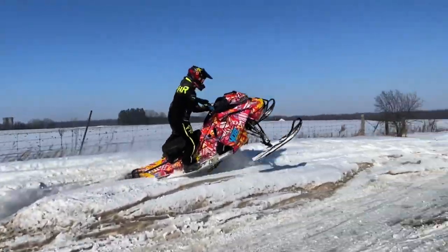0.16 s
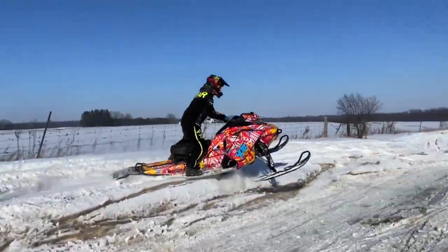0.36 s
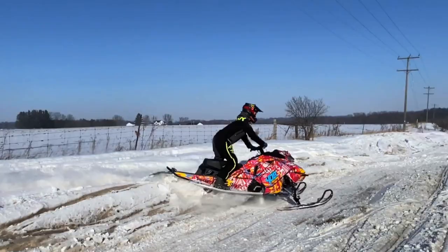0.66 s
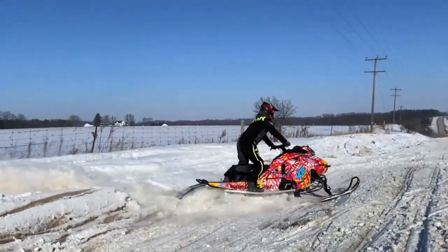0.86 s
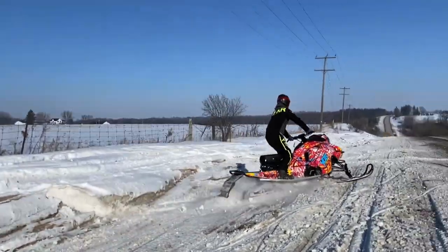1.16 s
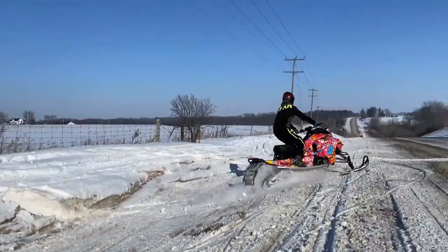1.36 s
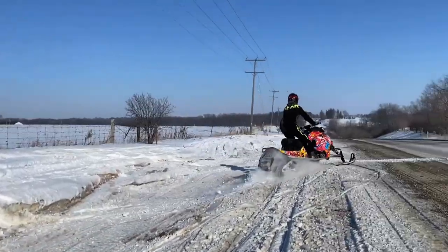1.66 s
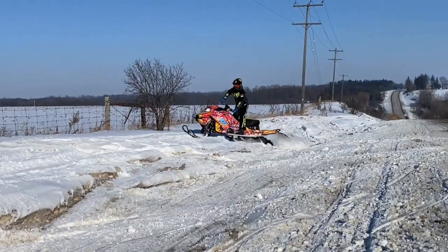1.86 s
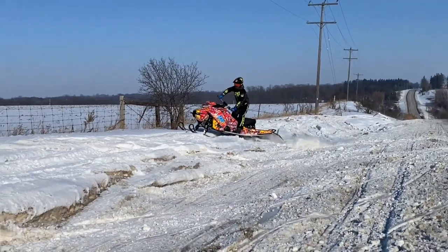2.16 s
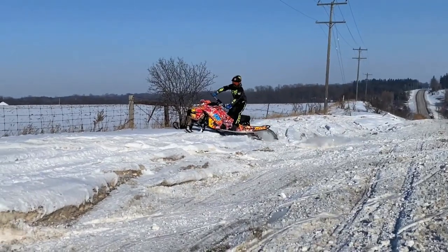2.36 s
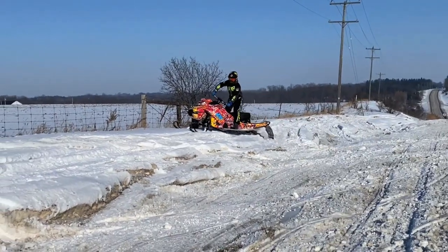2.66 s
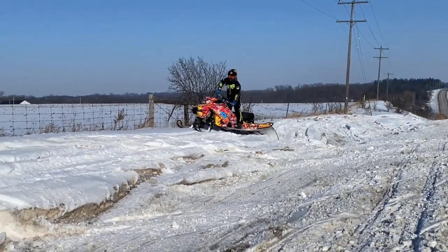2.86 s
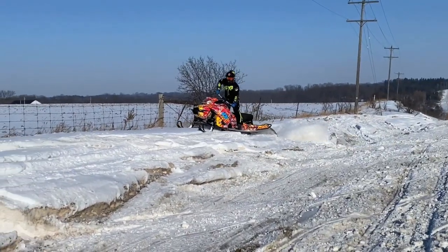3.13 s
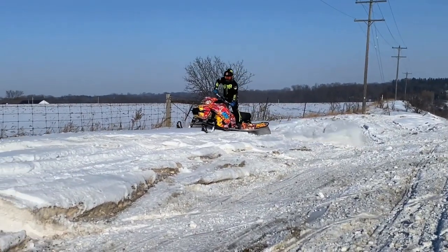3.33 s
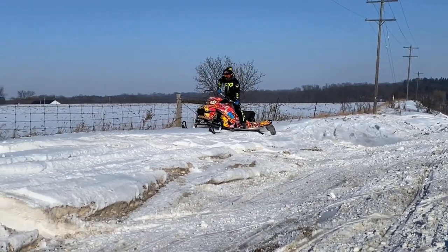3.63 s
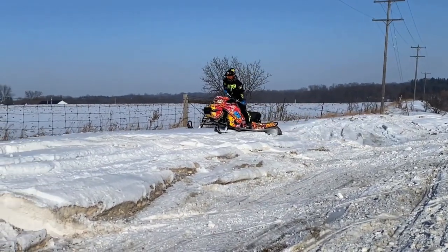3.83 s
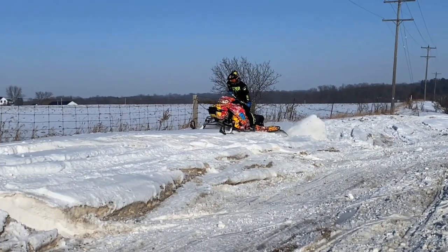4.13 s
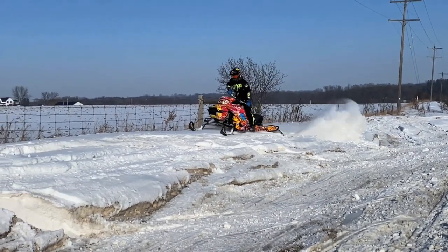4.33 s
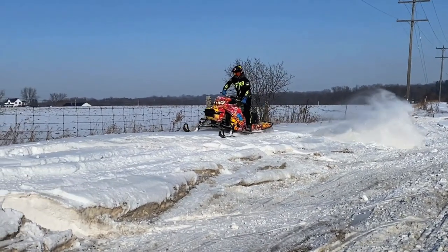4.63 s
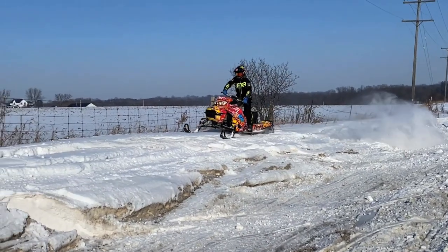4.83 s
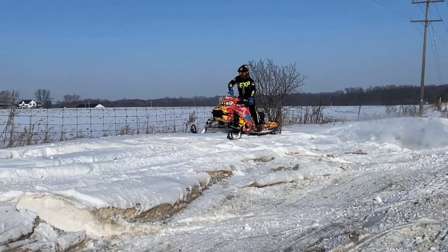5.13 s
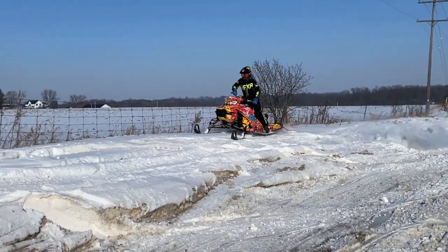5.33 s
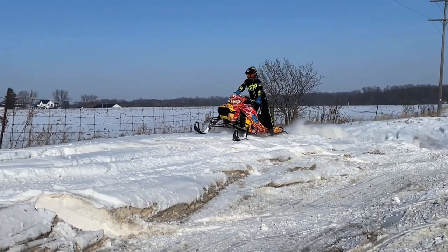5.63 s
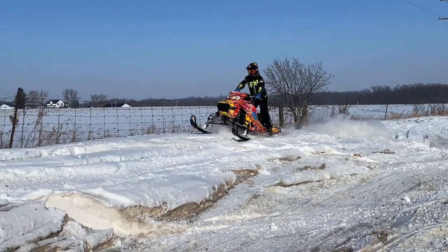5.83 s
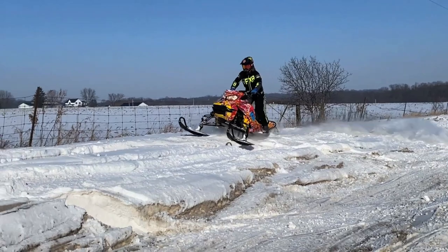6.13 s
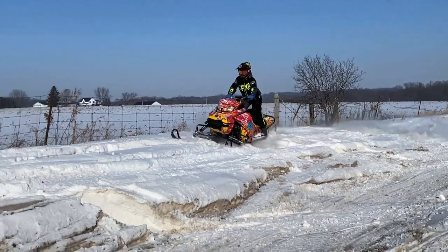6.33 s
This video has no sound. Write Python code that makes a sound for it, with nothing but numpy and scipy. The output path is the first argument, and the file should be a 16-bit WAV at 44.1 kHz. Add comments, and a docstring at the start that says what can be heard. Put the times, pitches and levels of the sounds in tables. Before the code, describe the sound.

Outdoors on packed snow, a two-stroke snowmobile passes close to the microphone at high revs, then shuts the throttle and burbles away with exhaust pops. Suddenly farther off, it gives two short blips and a harder rev, its track clattering softly underneath. After more popping, it climbs steeply to a loud, raspy full-throttle run toward the microphone, with a light hiss of thrown snow, and drops back again.

```python
"""Two-stroke snowmobile on packed snow.

It wheelies past, shuts the throttle and burbles away with one blip. At 1.7 s the listening position
jumps: the sled is farther off, facing back, and gives two blips, a harder rev and a full-throttle run
closer. Each firing is a pulse in the exhaust; off throttle the engine runs down and fires in stray pops.
Engine speed and load drive the muffler's drone, the track's clatter and the snow it throws."""
import sys
import numpy as np
from scipy import signal
from scipy.fft import rfft, irfft, next_fast_len
from scipy.io import wavfile
from scipy.ndimage import uniform_filter1d

SR = 44100
rng = np.random.default_rng(int(sys.argv[2]) if len(sys.argv) > 2 else 0)


def master(y):
    """Save y as 16-bit WAV."""
    cut = np.clip(np.atleast_2d(y).T, -1, 1)
    pcm = np.round(cut * 32767)  # scale
    wavfile.write(sys.argv[1], SR, pcm.astype(np.int16))


N = 286209
T = np.arange(N) / SR
SWITCH_S = 1.729  # listening position jumps

# Engine speed in the three long runs. Each row: time in seconds, firing rate in Hz.
JUMP_SPEED = [(0.0, 265.7), (0.07, 262.7), (0.152, 245.6), (0.218, 245.6), (0.336, 251.4), (0.42, 249.1),
              (0.542, 240.7), (0.6, 239), (0.701, 220), (0.72, 213)]
REV_SPEED = [(3.581, 144), (3.66, 153.1), (3.72, 175.9), (3.764, 204.5), (3.83, 214.5), (3.9, 225),
             (4.004, 252.4), (4.084, 264), (4.118, 262.8)]
CHARGE_SPEED = [(4.95, 141.1), (5.068, 167.1), (5.16, 207), (5.2, 208.6), (5.262, 219.4), (5.32, 227.5),
                (5.414, 252.5), (5.524, 266.3), (5.828, 264.4), (5.922, 265.8), (5.966, 260.5),
                (5.99, 256.1)]
# Throttle blips. Each row: opening, clutch bite, top and shut times in seconds; bite, top and idle rates
# in Hz; fall time in seconds; bark drop after the bite in dB (negative: above its level at shut);
# bark and rasp at shut in dB.
BLIPS = [(1.112, 1.158, 1.24, 1.285, 157.1, 167, 143.8, .1, -2, -41.5, -59),
         (1.764, 1.848, 2.0, 2.01, 179.4, 216, 152.9, .16, -2, -43, -62),
         (2.58, 2.779, 2.85, 2.895, 207.3, 219, 144, .18, -1, -39.5, -60)]
# Exhaust level in the long runs. Each row: time in seconds, bark in dB, rasp in dB.
WHEELIE_LEVELS = [(0, -22, -27), (0.102, -22, -28.5), (0.163, -24, -60)]
LANDING_LEVELS = [(.11, -26.5, -70), (.19, -24, -36), (.304, -23.5, -29.5), (0.428, -23, -33.5),
                  (0.53, -26, -35), (.562, -27, -61.5), (0.701, -36.5, -51.5), (.76, -63, -70)]
REV_LEVELS = [(3.6, -51.5, -76), (3.72, -40, -56), (3.8, -40, -56), (3.9, -33.5, -45), (3.98, -32.5, -44),
              (4.12, -34, -42), (4.165, -67, -71)]
CHARGE_LEVELS = [(4.94, -43, -67), (5.131, -36.5, -52), (5.269, -28.5, -45.5), (5.329, -20.5, -34.5),
                 (5.386, -24.5, -35), (5.427, -18, -27.5), (5.52, -22, -28), (5.66, -19, -24.5),
                 (5.841, -17, -21), (5.998, -16.5, -25)]
# Weak firing during run-down. Each row: start in seconds, length in seconds, bark in dB, rasp in dB.
OVERRUNS = [(2.03, 0.21, -63, -82), (4.162, 0.36, -56, -62), (6.114, 0.19, -36.5, -57)]
# One cylinder fires weakly until speed is up. Each row: time in seconds, imbalance from 0 to 1.
IMBALANCE = [(3.65, .15), (3.8, .42), (3.92, .38), (4.02, .28), (4.12, .26), (5.0, .18), (5.42, .15),
             (5.55, .06)]
# Uneven firing, which roughens the rasp. Each row: time in seconds, timing scatter in ms.
JITTER = [(0, .008), (.13, .013), (.25, .011), (.33, .008), (.45, .009), (.55, .012), (.72, .012),
          (5.0, .034), (5.3, .027), (5.46, .022), (5.54, .008), (5.84, .008), (5.89, .012), (5.99, .013)]
# Base levels before and after the switch. Each row: time in seconds; drone, howl, clatter, rumble in dB.
AWAY_LEVELS = [(0, -55, -85, -45, -49), (.55, -42, -78, -54, -51), (.9, -46.5, -81, -58, -47),
               (1.25, -42, -78, -57, -50), (1.72, -50, -79, -60, -48.5)]
RETURN_LEVELS = [(1.741, -53, -56, -48.5, -47), (2.05, -49, -53, -45.5, -47), (2.3, -49.5, -51, -45.5, -45),
                 (2.75, -51.5, -57.5, -46, -49), (3.4, -52, -60, -48, -48.5),
                 (4.149, -54, -59, -44.5, -44.5), (4.8, -43, -52, -49, -48.5), (5.5, -42, -37.5, -43, -43),
                 (6.1, -40, -44, -44, -45), (6.49, -38.5, -48, -46.5, -47)]
# Stray firings. Each row: start in seconds, length in seconds, boom and crack in relative dB.
POPS = [(.7893, .004, -32, -29.5), (.801, .004, -25, -35.5), (.8068, .022, -28, -36),
        (.8363, .01, -31, -42), (.8482, .004, -30, -43), (.854, .01, -30, -40), (.866, .004, -34, -43),
        (.945, .022, -32, -36.5), (1.002, .01, -28, -40.5), (1.060, .012, -30, -40),
        (1.092, .012, -27, -38.5), (1.137, .012, -31, -37), (1.399, .012, -38, -42),
        (1.415, .026, -28, -39), (1.521, .04, -31, -40), (1.668, .012, -27, -40), (3.282, .012, -37, -46),
        (3.358, .012, -34, -46), (3.415, .012, -37, -46), (3.564, .012, -36, -46), (4.169, .03, -36, -38),
        (4.41, .025, -34, -43), (4.514, .012, -27, -35), (4.597, .01, -29, -41), (4.666, .012, -29, -37),
        (4.736, .012, -29, -35.5), (4.816, .012, -24, -38), (4.929, .012, -30, -36),
        (6.041, .024, -32, -25), (6.302, .012, -32, -33), (6.318, .01, -21, -28), (6.427, .012, -22, -36),
        (6.450, .01, -24, -35), (6.474, .01, -24, -37)]
# Tunnel and hood modes. Each row: frequency in Hz, relative level in dB, 60 dB decay time in seconds.
PANEL_MODES = [(880, -1.5, 0.046), (1149, 2, 0.049), (1763, -1.5, 0.045), (1880, -4, 0.075),
               (2397, -12, 0.083), (2695, -7, 0.078)]
# Metallic ring in the turn. Each row: time in seconds, pitch in Hz, level in dB.
RING_PATH = [(1.73, 1775, -52), (1.81, 1780, -52), (1.89, 1680, -49), (2.0, 1707, -52), (2.06, 1725, -60),
             (2.15, 1690, -56), (2.24, 1660, -60), (2.36, 1685, -74)]

# Exhaust spectra by heading and throttle state. Each row: frequency in Hz, relative gain in dB.
NOSE_UP = [(200, -35.5), (265, -3), (400, -6), (530, 3), (790, -9), (1060, -6), (1320, -7.5), (1590, -8),
           (1850, -3), (2150, -20), (2400, -15.5), (3000, -21.5), (3450, -23), (4200, -21), (4700, -33.5),
           (5600, -38), (6400, -27), (7100, -27.5), (10000, -45), (15000, -63)]
SIDE_ON = [(190, -19), (250, -7.5), (500, 17.5), (750, 17.5), (1000, 14.5), (1250, 9), (1500, 11.5),
           (2000, 5), (2250, -12), (2500, 6), (2750, -4), (3000, 6), (3450, -7.5), (3780, 8.5), (4300, 1.5),
           (5500, -22.5), (6700, -1.5), (12000, -40)]
TAIL_ON = [(160, -12), (240, -4.5), (460, 10.5), (690, -9.5), (930, 6), (1200, 11.5), (1420, 2), (1750, -9),
           (2050, 5), (2650, -13), (3300, -34), (4300, -39), (6000, -55), (12000, -74)]
NEARLY_SHUT = [(100, -32), (300, -16), (480, 26), (650, 17.5), (950, 9), (1400, 13.5), (1900, 5),
               (2600, -15), (4000, -19), (6000, -41), (12000, -50)]
TURNING = [(150, -46), (300, -14), (400, 4), (600, 6), (800, -3), (1200, 5), (1550, 9), (1700, 8),
           (1950, 5), (2270, 10), (2500, -5), (2750, 4), (3400, -23), (3900, -13), (7500, -25),
           (14000, -60)]
COASTING = [(100, -28), (190, 17.5), (300, -12), (560, 8), (720, 3), (880, 18), (1050, -3), (1230, -10),
            (1420, -6), (1600, -20), (1830, 5), (2300, -7), (2680, -22), (3300, -11), (6000, -20),
            (12000, -52)]
BROADSIDE = [(150, -29), (240, -19), (440, -1), (650, 6), (870, 7), (1090, 10.5), (1310, 7), (1550, 10),
             (1950, 2), (2200, 2), (2370, 15.5), (2530, -9), (2750, 3), (3900, -6), (7500, -31),
             (14000, -62)]
FAR_OFF = [(150, -32), (240, -49), (340, 2), (530, 19), (620, 5), (760, 10.5), (850, 5.5), (980, 11.5),
           (1330, 4), (1550, 6), (1750, 8), (2100, -4), (2320, 13.5), (2550, -1), (2900, -0.5), (4200, -1),
           (7500, -17), (11500, -31), (14000, -59)]
APPROACH = [(160, -29), (250, -3), (450, 11), (700, -2), (930, 10.5), (1130, 8), (1450, 1.5), (1900, 4.5),
            (2400, -1), (2850, 0.5), (3400, -5), (4000, -4), (6100, -10.5), (8400, -20.5), (13500, -41)]
HEAD_ON = [(160, -29.5), (250, -3.5), (400, 5), (530, 7.5), (790, 5), (1060, 8), (1320, 1.5), (1700, 4.5),
           (2150, 0.5), (3500, -4.5), (6100, -9), (8400, -24.5), (11000, -27.5), (13500, -41)]
# Muffler, expansion chamber, chassis, track and snow. Each row: frequency in Hz, relative gain in dB.
MUFFLER = [(70, -21), (140, 3.5), (260, 5), (310, -14.5), (450, 2), (560, -15), (700, -31), (880, -33.5),
           (1300, -16.5), (1850, -21), (3500, -45), (9000, -75.5)]
CHAMBER = [(250, -43), (380, -1.5), (450, 5.5), (530, -2.5), (610, -1.5), (720, -26), (1100, -45.5),
           (3000, -81)]
RUMBLE = [(18, -42), (32, -9.5), (50, 0), (80, 10), (130, 4), (200, 1.5), (300, -15), (600, -42),
          (2000, -82), (8000, -108)]
CLATTER = [(150, -41), (250, -12.5), (305, -6), (411, -5), (461, -3), (631, -5), (850, 1), (2180, -8),
           (2570, -14.5), (2790, -15), (7050, -29.5), (10800, -65), (13000, -91)]
SPRAY = [(1500, -29), (3000, 9.5), (4500, 0.5), (7500, -4.5), (8600, -16), (11000, -22), (14000, -51)]
# Pops close behind, drawing away and far off. Each row: frequency in Hz, relative gain in dB.
SHARP_CRACK = [(100, 3), (480, 14.5), (750, 9), (1150, 7), (2000, 5), (2400, -2), (2800, 0.5), (4100, -4),
               (5500, -31), (7500, -17), (12000, -50)]
DULL_CRACK = [(100, -3), (480, 13.5), (700, 12), (1150, 14.5), (2000, 6), (2400, -10), (4200, -4),
              (5500, -41), (7500, -33), (12000, -53)]
FAR_CRACK = [(100, 5), (300, 5), (480, 15), (680, 6), (1000, 13), (1400, 0), (1900, 4), (2600, -9),
             (4000, -10), (6000, -16), (12000, -41)]
# Stereo balance before and after the switch. Each row: frequency in Hz, left minus right in dB.
AWAY_BALANCE = [(60, -3), (150, -5.5), (380, -7.5), (950, -6.5), (2380, -3), (5980, -4.5), (15000, -8)]
RETURN_BALANCE = [(60, -1), (150, -4.5), (380, -3.5), (950, -5), (2380, 1), (5980, -0.5), (15000, 0.5)]


def amp(db):
    """Decibels to gain."""
    return 10 ** (np.asarray(db) / 20)


def unit(x):
    """Scales to rms 1."""
    return x / np.sqrt(np.mean(x ** 2) + 1e-20)


def follow(rows):
    """Columns of a time table at every sample."""
    times_s, *columns = np.transpose(rows)
    return [np.interp(T, times_s, column) for column in columns]


def spectrum_db(spectrum, hz):
    """Interpolates a spectrum over log frequency."""
    points_hz, db = np.transpose(spectrum)
    return np.interp(np.log(hz + 1), np.log(points_hz + 1), db)


def colour(x, spectrum, size=4096):
    """Minimum-phase filter of energy 1: a body rings only after it is struck."""
    log_gain = np.log(amp(spectrum_db(spectrum, abs(np.fft.fftfreq(size, 1 / SR)))))
    ring = np.fft.ifft(np.exp(np.conj(signal.hilbert(log_gain)))).real[:size // 2]
    return signal.oaconvolve(x, ring / np.linalg.norm(ring))[:N]


def wander(rate_hz):
    """Slow random curve of rms 1."""
    size = next_fast_len(N)
    rolloff = 1 + (np.fft.rfftfreq(size, 1 / SR) / rate_hz) ** 4
    return unit(irfft(rfft(rng.standard_normal(size)) / rolloff, size)[:N])


def steady(x, size=1500):
    """Holds short-time rms at 1."""
    power = uniform_filter1d(uniform_filter1d(x ** 2, size), size)
    return x / np.sqrt(abs(power) + 1e-12)


def clicks(times_s, sizes, order=8):
    """Band-limited clicks at exact times."""
    index = np.round(times_s * SR).astype(int)[:, None] + np.arange(-order, order + 1)
    offset = index - times_s[:, None] * SR
    shape = sizes[:, None] * np.sinc(offset) * np.sinc(offset / (order + 1))
    inside = (index >= 0) & (index < N)
    return np.bincount(index[inside], shape[inside], N)


def grains(per_s, spread_db):
    """Dense impacts of random size."""
    sizes = amp(spread_db * np.minimum(rng.exponential(1, N), 4)) * rng.standard_normal(N)
    return unit(sizes * (rng.random(N) < per_s / SR))


def coast(rate_hz, shut_s, idle_hz, fall_s):
    """Throttle shut: drag pulls the engine down to idle."""
    remaining = np.exp(-(np.maximum(T - shut_s, 0) / fall_s) ** 1.4)
    return np.where(T < shut_s, rate_hz, idle_hz + (np.interp(shut_s, T, rate_hz) - idle_hz) * remaining)


def spin_up(rate_hz, start_s, bite_s, top_s, bite_hz, top_hz):
    """The free engine accelerates until the clutch bites, then climbs evenly."""
    free_hz = rate_hz + (bite_hz - rate_hz) * np.clip((T - start_s) / (bite_s - start_s), 0, 1) ** 2
    return np.where(T < bite_s, free_hz, np.interp(T, [bite_s, top_s], [bite_hz, top_hz]))


def firing_rate_hz():
    """Engine speed: a run-down follows each throttle opening."""
    away = coast(follow(JUMP_SPEED)[0], JUMP_SPEED[-1][0], idle_hz=156, fall_s=.065)
    back = coast(np.full(N, 201), SWITCH_S, idle_hz=176, fall_s=.05)
    legs = [away, back]
    for start_s, bite_s, top_s, shut_s, bite_hz, top_hz, idle_hz, fall_s, *_ in BLIPS:
        leg = int(shut_s > SWITCH_S)
        climb = spin_up(legs[leg], start_s, bite_s, top_s, bite_hz, top_hz)
        legs[leg] = coast(climb, shut_s, idle_hz, fall_s)
    rev = coast(follow(REV_SPEED)[0], REV_SPEED[-1][0], idle_hz=139, fall_s=.215)
    charge = coast(follow(CHARGE_SPEED)[0], CHARGE_SPEED[-1][0], idle_hz=140, fall_s=.178)
    return np.select([T < SWITCH_S, T < REV_SPEED[0][0], T < CHARGE_SPEED[0][0]], legs + [rev], charge)


def engine_load(ramp_s=.11):
    """1 with the throttle open, 0 with it shut."""
    spans_s = [(run[0][0], run[-1][0]) for run in (JUMP_SPEED, REV_SPEED, CHARGE_SPEED)]
    spans_s += [(blip[0], blip[3]) for blip in BLIPS]
    return sum(np.clip(np.minimum(T - start, shut - T) / ramp_s + .5, 0, 1) for start, shut in spans_s)


def firings(cycles, jitter_ms, imbalance, skew_ms, scatter_db=.2):
    """One pulse per firing; the two cylinders differ in strength and timing, a wavering growl."""
    def at_firings(value):
        return np.interp(times_s, T, value * np.ones(N))

    count = np.arange(1, int(cycles[-1]))
    lateness, strength = rng.standard_normal((len(count), 2)).T
    times_s = np.interp(count, cycles, T)
    cylinder = (-1) ** count * (1 + .42 * at_firings(wander(21)))
    late_ms = at_firings(jitter_ms) * lateness + skew_ms * cylinder
    sizes = amp(at_firings(scatter_db) * strength) * (1 + at_firings(imbalance) * cylinder)
    return clicks(times_s + late_ms / 1000, sizes)


def disperse(x, smear_ms, corner_hz=2000):
    """Lows leave the pipe after highs: each pulse becomes a falling chirp."""
    size = next_fast_len(N + 1024)
    hz = np.fft.rfftfreq(size, 1 / SR)
    lag_cycles = smear_ms / 1000 * corner_hz * np.log1p(hz / corner_hz)
    return irfft(rfft(x, size) * np.exp(-2j * np.pi * lag_cycles), size)[:N]


def exhaust_burst(cycles, levels, poses, gas, jitter_ms, imbalance, skew_ms,
                  echo, echo_ms, open_s, shut_s):
    """Blow-down pulses and gas puffs, piped and echoed; bark lies below 2.7 kHz, rasp above."""
    start_s, end_s = levels[0][0], levels[-1][0]
    puffs = unit((.4 + np.exp(-(cycles % 1) / .35)) * rng.standard_normal(N))
    puffs += .65 * signal.sosfiltfilt(signal.butter(2, 2000, "high", fs=SR, output="sos"), puffs)
    drive = unit(firings(cycles, jitter_ms, imbalance, skew_ms)) + gas * puffs
    # Poses crossfade. Each row: time in seconds, spectrum, smear in ms.
    shares = [np.interp(T, [pose[0] for pose in poses], only) for only in np.eye(len(poses))]
    direct = sum(share * colour(disperse(drive, smear_ms), pipe)
                 for share, (_, pipe, smear_ms) in zip(shares, poses))
    snow_ms = np.interp(T, [start_s, end_s], echo_ms) + .02 * wander(5)
    bank_ms = np.interp(T, [start_s, end_s], [2.525, 3.32])
    voice = direct + echo * np.interp(T - snow_ms / 1000, T, direct)
    voice += .38 * np.interp(T - bank_ms / 1000, T, direct)
    bark = signal.sosfiltfilt(signal.butter(4, 2700, fs=SR, output="sos"), voice)
    bark_db, rasp_db = follow(levels)
    flutter_db = 1.13 * wander(46)
    opening = np.clip((T - start_s) / open_s, 0, 1) if start_s > open_s else 1
    gate = opening * np.clip((end_s - T) / shut_s, 0, 1)
    return gate * (amp(bark_db) * steady(bark) + amp(rasp_db + flutter_db) * steady(voice - bark))


def effort_levels(times_s, drops_db, bark_db, rasp_db):
    """Level rows below full effort: rasp drops 0.66 dB per dB of bark."""
    return [(s, bark_db - drop, rasp_db - .66 * drop) for s, drop in zip(times_s, drops_db)]


def exhaust(cycles, clean=.045, gruff=.075, ragged=.1, overrun_db_per_s=24):
    """All runs, blips and overruns: little gas noise when near and loaded, more when far or coasting."""
    jitter_ms, imbalance = follow(JITTER)[0], follow(IMBALANCE)[0]
    out = exhaust_burst(cycles, WHEELIE_LEVELS, [(0, NOSE_UP, 1.96)], clean,
                        jitter_ms, imbalance=.036, skew_ms=.0056,
                        echo=.52, echo_ms=(1.9, 2.0), open_s=.05, shut_s=.042)
    out += exhaust_burst(cycles, LANDING_LEVELS, [(.48, SIDE_ON, 1.57), (.63, TAIL_ON, 1.3)], clean,
                         jitter_ms, imbalance=.06, skew_ms=.016,
                         echo=.55, echo_ms=(.46, .22), open_s=.048, shut_s=.045)
    closing_in = [(5.33, APPROACH, 1.4), (5.49, HEAD_ON, 1.4), (5.55, HEAD_ON, .65)]
    out += exhaust_burst(cycles, CHARGE_LEVELS, closing_in, clean, jitter_ms, imbalance, skew_ms=.006,
                         echo=.38, echo_ms=(.92, 1.13), open_s=.078, shut_s=.0084)
    out += exhaust_burst(cycles, REV_LEVELS, [(0, FAR_OFF, 3.2)], ragged,
                         jitter_ms=.03, imbalance=imbalance, skew_ms=.038,
                         echo=.3, echo_ms=(.8, 1.05), open_s=.05, shut_s=.03)
    for start_s, bite_s, _, shut_s, *_, drop_db, bark_db, rasp_db in BLIPS:
        times_s = [start_s, min(bite_s + .065, shut_s), shut_s, shut_s + .11]
        levels = effort_levels(times_s, [18, drop_db, 0, 26], bark_db, rasp_db)
        if shut_s < SWITCH_S:
            out += exhaust_burst(cycles, levels, [(0, NEARLY_SHUT, 1.27)], gruff,
                                 jitter_ms=.045, imbalance=.06, skew_ms=.01,
                                 echo=1.0, echo_ms=(1.75, 1.75), open_s=.046, shut_s=.039)
        else:
            out += exhaust_burst(cycles, levels, [(2.1, TURNING, 3.2), (2.6, BROADSIDE, 3.2)], ragged,
                                 jitter_ms=.032, imbalance=.3, skew_ms=.025,
                                 echo=.12, echo_ms=(.9, 1.0), open_s=.11, shut_s=.05)
    for start_s, length_s, bark_db, rasp_db in OVERRUNS:
        drops_db = [0, overrun_db_per_s * length_s]
        levels = effort_levels([start_s, start_s + length_s], drops_db, bark_db, rasp_db)
        out += exhaust_burst(cycles, levels, [(0, COASTING, 2.575)], gruff,
                             jitter_ms=.018, imbalance=.1, skew_ms=.015,
                             echo=.2, echo_ms=(1.1, 1.2), open_s=.05, shut_s=.05)
    return out


def drone(cycles, rate_hz, load, drone_db, howl_db, chamber_hz=523, reach_hz=46):
    """Pistons pump the muffler, fired or not; the chamber howls when a harmonic nears its note."""
    pulses = firings(cycles, jitter_ms=.0047, imbalance=.011, skew_ms=.003, scatter_db=3 - 2.5 * load)
    miss_hz = chamber_hz - rate_hz * np.round(chamber_hz / rate_hz)
    howl_gain = amp(howl_db + 12 * load) / (1 + (miss_hz / reach_hz) ** 2)
    muffler = amp(drone_db + 7 * load) * steady(colour(pulses, MUFFLER))
    return muffler + howl_gain * steady(colour(pulses, CHAMBER))


def rumble(level_db):
    """Low lumpy noise of the chassis over rough snow."""
    return amp(level_db + 2.3 * wander(20.5)) * unit(colour(rng.standard_normal(N), RUMBLE))


def panels():
    """Track knocks ring the tunnel and hood panels."""
    knocks = grains(per_s=450, spread_db=-4)
    t = T[:SR // 8]
    ring = sum(amp(db - 60 * t / t60_s) * np.sin(2 * np.pi * hz * t) for hz, db, t60_s in PANEL_MODES)
    return unit(signal.oaconvolve(knocks, ring)[:N])


def track(rate_hz, load, idle_db, idle_hz=140, taut_db=-4.5):
    """Lugs and rails clatter with speed, less when taut; snow crumbles off, and sprays under load."""
    octaves = np.log2(rate_hz / idle_hz)
    clatter_db = idle_db + 8.5 * octaves + taut_db * load
    crumb_gain = amp(clatter_db - 17)
    thrown_gain = load * amp(np.where(T < SWITCH_S, -81, -76) + 39 * octaves)
    lugs = colour(grains(per_s=7000, spread_db=-1.5), CLATTER) + amp(-3) * panels()
    spray = colour(grains(per_s=10000, spread_db=1), SPRAY)
    clatter = unit(lugs) * amp(clatter_db + 1.6 * wander(16))
    return clatter + unit(spray) * np.hypot(crumb_gain, thrown_gain) * amp(2 * wander(36))


def burble(rate_hz, boom_hz=150, boom_width_hz=90, overtone_hz=500, fizz_s=.002):
    """Stray firings crack and fizz at once; the pipe's boom swells just behind."""
    booms, cracks = np.zeros((2, N))
    for start_s, length_s, boom_db, crack_db in POPS:
        times_s = np.arange(start_s, start_s + length_s, 1 / np.interp(start_s, T, rate_hz))
        sizes = amp(.46 * rng.standard_normal(len(times_s)))
        booms += clicks(times_s, amp(boom_db) * np.sqrt(sizes))
        # The first firing finds the pipe full of fuel.
        cracks += clicks(times_s, amp(crack_db) * np.where(times_s > start_s, .28 * sizes, 1))
    t = T[:SR // 10]
    swell = np.pi * boom_width_hz * t
    tone = np.sin(2 * np.pi * boom_hz * t) + amp(-13) * np.sin(2 * np.pi * overtone_hz * t)
    booms = signal.oaconvolve(booms, swell * np.exp(1 - swell) * tone)[:N]
    decay = np.exp(-t / fizz_s)
    fizz_envelope = np.sqrt(abs(signal.oaconvolve(cracks ** 2, decay / decay.sum())[:N]))
    far = T >= SWITCH_S
    fizz = np.where(far, .9, .45) * rng.standard_normal(N) * fizz_envelope
    cracks = disperse(cracks + fizz, smear_ms=.4)
    near = np.interp(T, [.85, 1.4], [1, 0])
    sharp = colour(cracks * near, SHARP_CRACK)
    dull = colour(cracks * (1 - near) * ~far, DULL_CRACK)
    distant = colour(cracks * far, FAR_CRACK)
    return amp(-6.5) * booms + amp(18.5) * (sharp + dull + distant)


def metal_ring(width_hz=32):
    """Narrow metallic ring in the turn, perhaps the brake disc rubbing."""
    hz, level_db = follow(RING_PATH)
    phase = 2 * np.pi * np.cumsum(hz) / SR
    tone = wander(width_hz) * np.cos(phase) + wander(width_hz) * np.sin(phase)
    return unit(tone) * amp(level_db) * (T > RING_PATH[0][0]) * (T < RING_PATH[-1][0])


def stereo(x, balance, left_lead_ms):
    """One source reaches left and right with a level and time difference."""
    size = next_fast_len(N + 4096)
    hz = np.fft.rfftfreq(size, 1 / SR)
    left = amp(spectrum_db(balance, hz) / 2) * np.exp(1j * np.pi * hz * left_lead_ms / 1000)
    pair = np.array([left, 1 / left])
    return irfft(rfft(x, size) * pair / abs(pair).mean(0), size)[:, :N]


def snow_banks(x, level_db=-23, decay_s=.025):
    """The banks scatter a faint, short echo, different on each side."""
    tail = rng.standard_normal((2, SR // 4)) * np.exp(-T[:SR // 4] / decay_s)
    return amp(level_db) * signal.oaconvolve(x[None], tail / np.linalg.norm(tail[0]), axes=1)[:, :N]


def scene():
    """The sled from two positions in turn, plus wide track noise, rumble and bank echo."""
    rate_hz, load = firing_rate_hz(), engine_load()
    drone_db, howl_db, clatter_db, rumble_db = follow(AWAY_LEVELS + RETURN_LEVELS)
    cycles = np.cumsum(rate_hz * (1 + .0009 * wander(40))) / SR
    engine = exhaust(cycles) + drone(cycles, rate_hz, load, drone_db, howl_db) + burble(rate_hz)
    sled = engine + rumble(rumble_db) + track(rate_hz, load, clatter_db) + metal_ring()
    away = stereo(sled, AWAY_BALANCE, left_lead_ms=.035)
    back = stereo(sled, RETURN_BALANCE, left_lead_ms=.018)
    wide = amp(-14) * track(rate_hz, load, clatter_db) + amp(-15) * rumble(rumble_db)
    return np.where(T < SWITCH_S, away, back) + np.array([wide, -wide]) + snow_banks(sled)


def record(dry):
    """Steep low-pass at 15.9 kHz."""
    return signal.oaconvolve(dry, signal.firwin(511, 15900, window=("kaiser", 9), fs=SR)[None], "same")


dry = scene()
out = record(dry)
master(out)
```